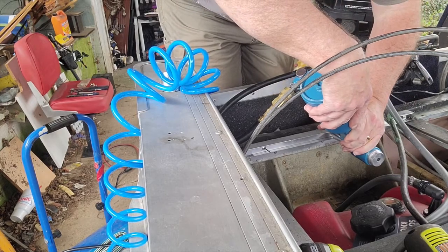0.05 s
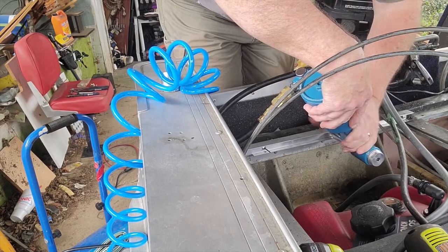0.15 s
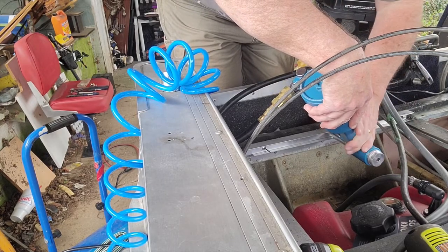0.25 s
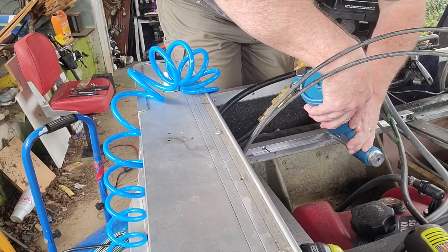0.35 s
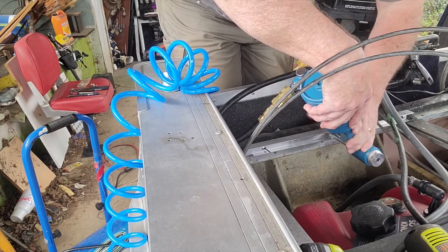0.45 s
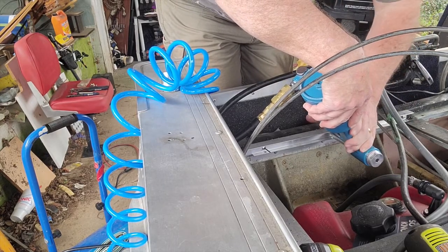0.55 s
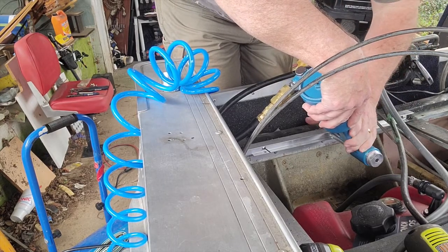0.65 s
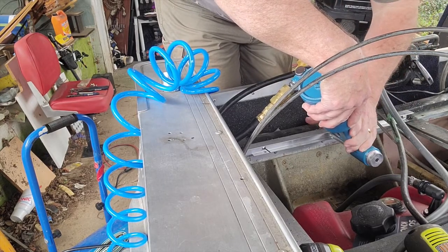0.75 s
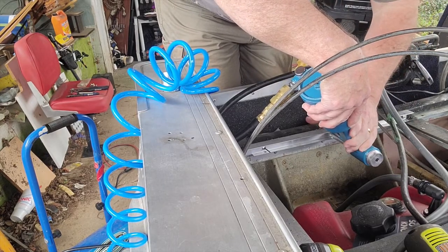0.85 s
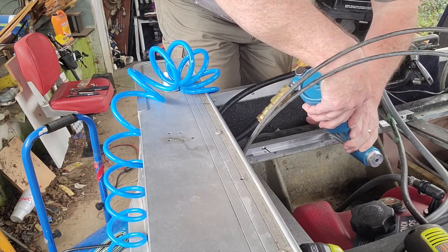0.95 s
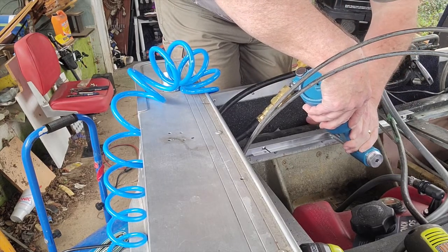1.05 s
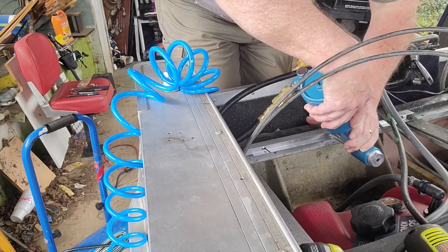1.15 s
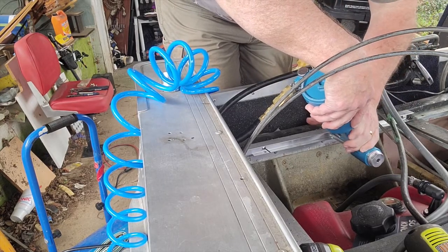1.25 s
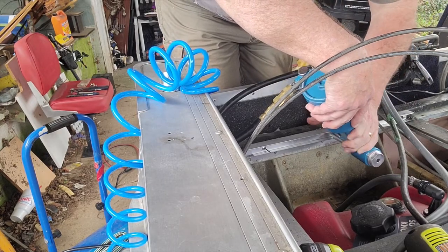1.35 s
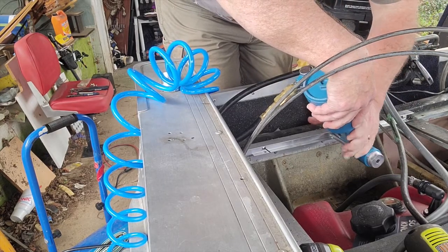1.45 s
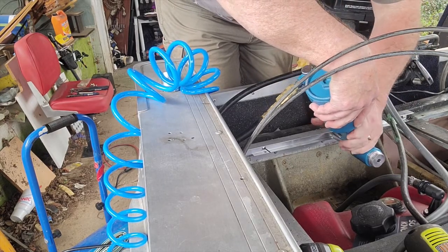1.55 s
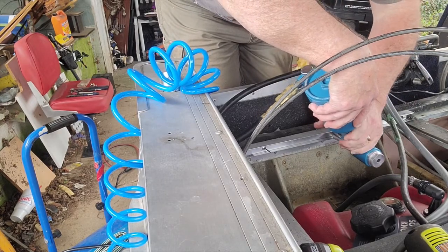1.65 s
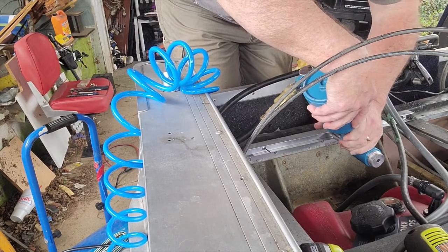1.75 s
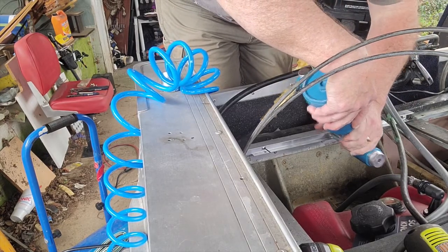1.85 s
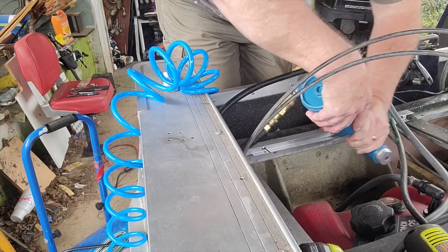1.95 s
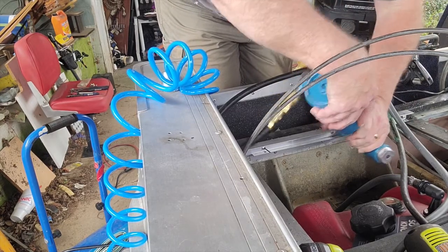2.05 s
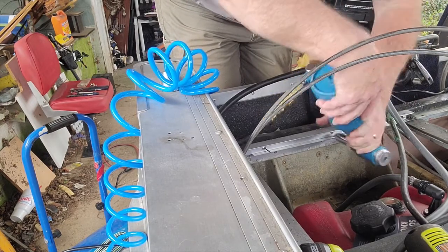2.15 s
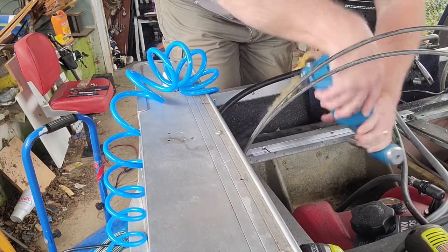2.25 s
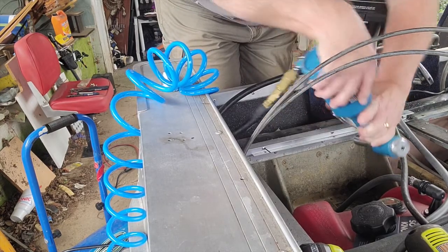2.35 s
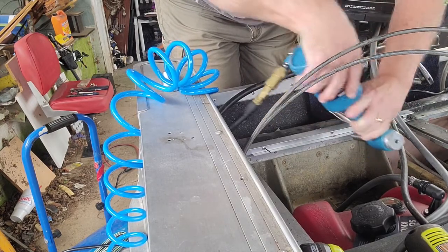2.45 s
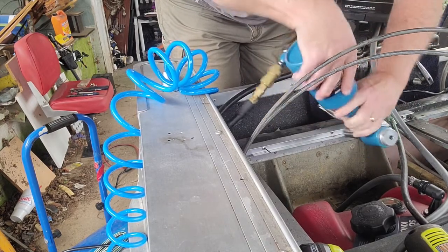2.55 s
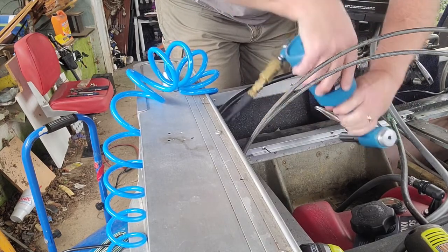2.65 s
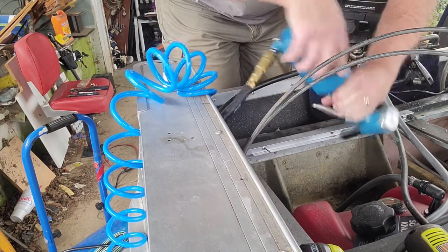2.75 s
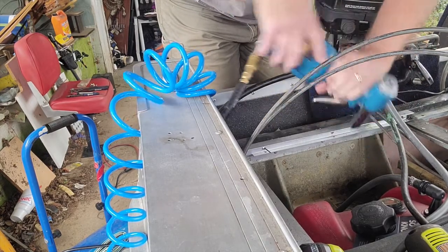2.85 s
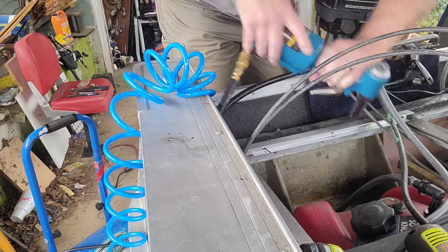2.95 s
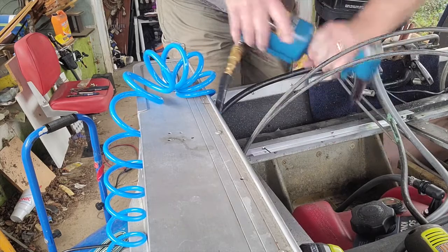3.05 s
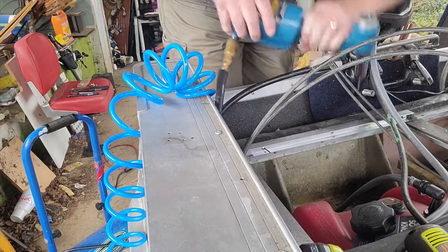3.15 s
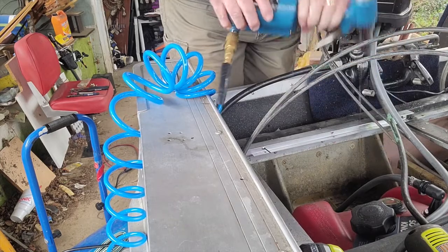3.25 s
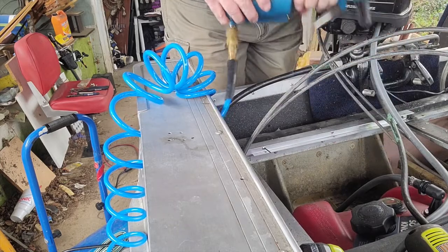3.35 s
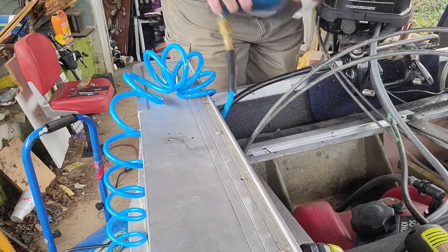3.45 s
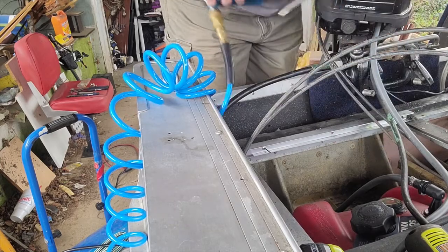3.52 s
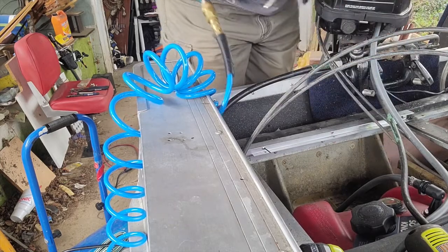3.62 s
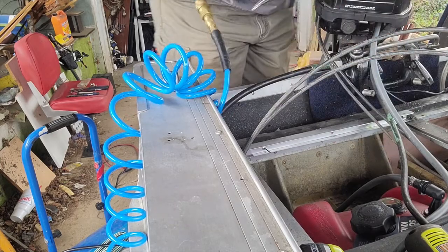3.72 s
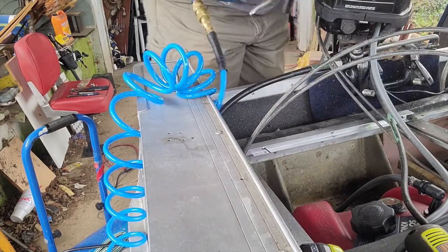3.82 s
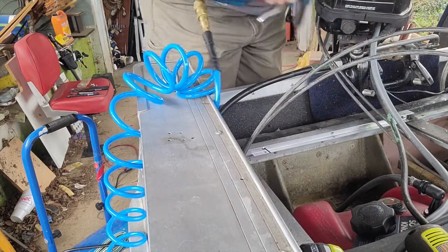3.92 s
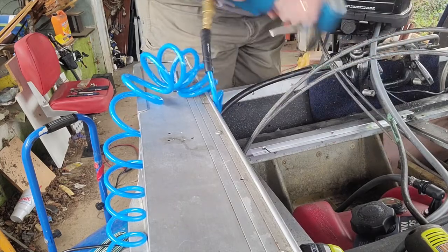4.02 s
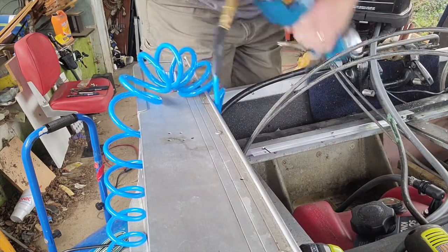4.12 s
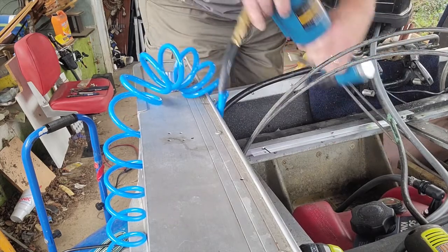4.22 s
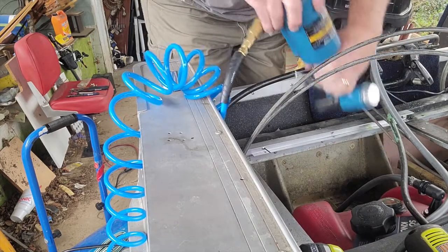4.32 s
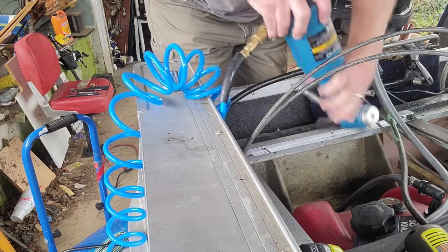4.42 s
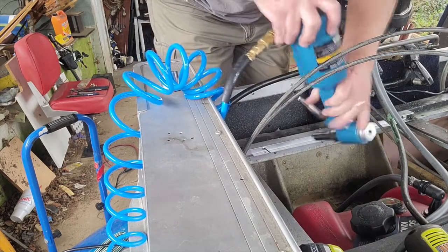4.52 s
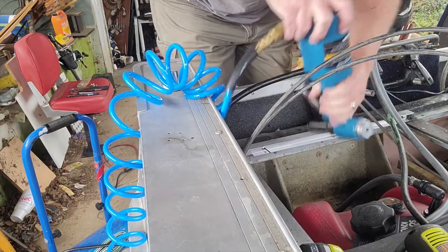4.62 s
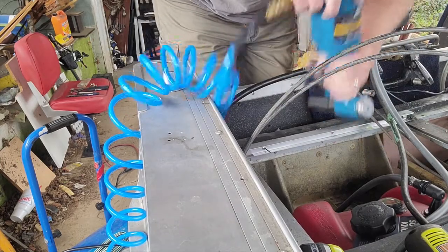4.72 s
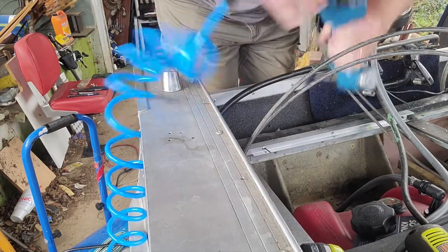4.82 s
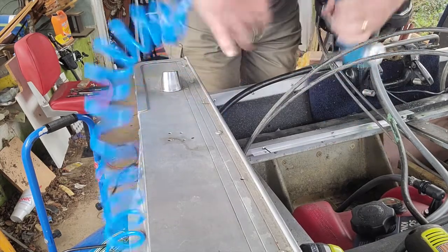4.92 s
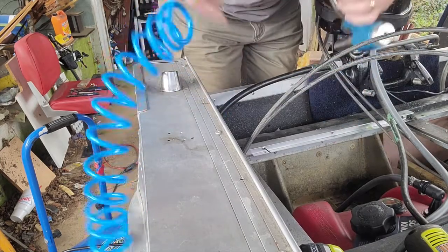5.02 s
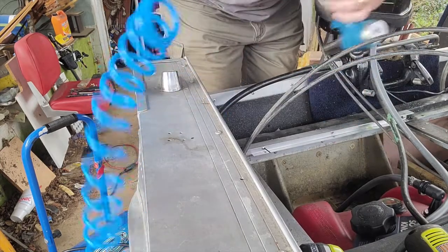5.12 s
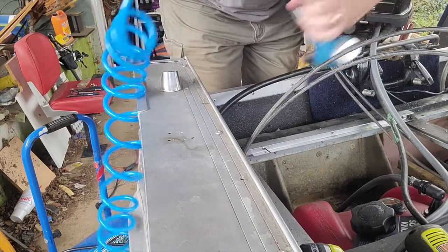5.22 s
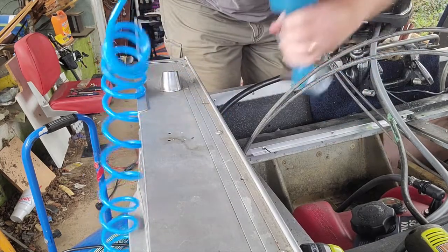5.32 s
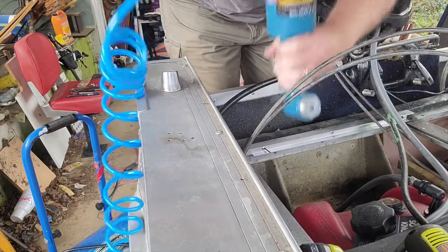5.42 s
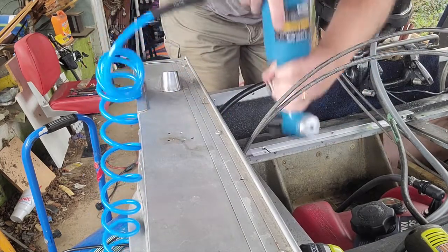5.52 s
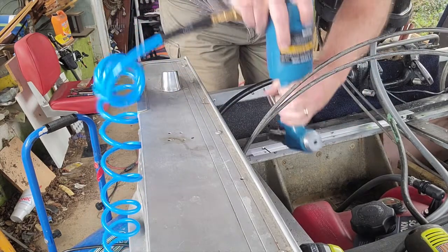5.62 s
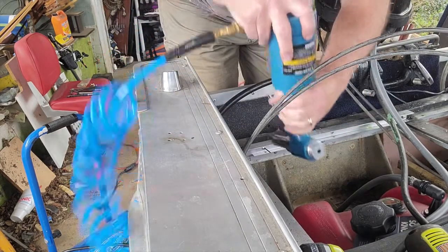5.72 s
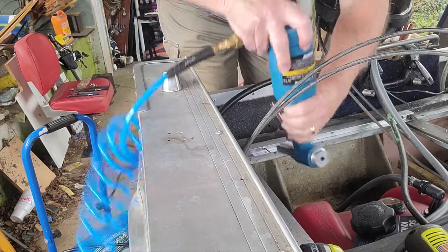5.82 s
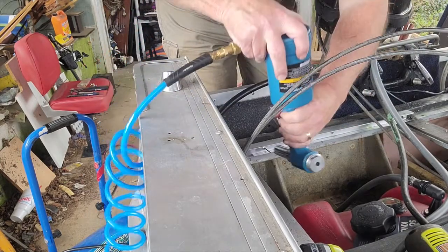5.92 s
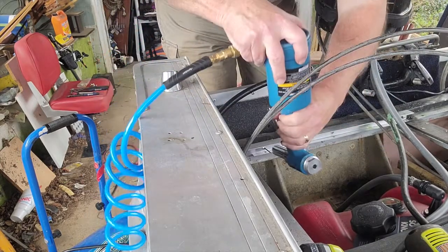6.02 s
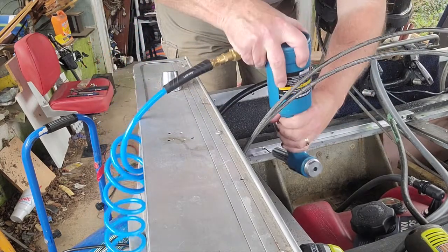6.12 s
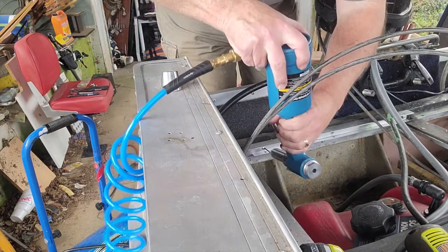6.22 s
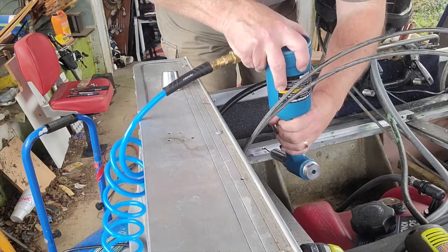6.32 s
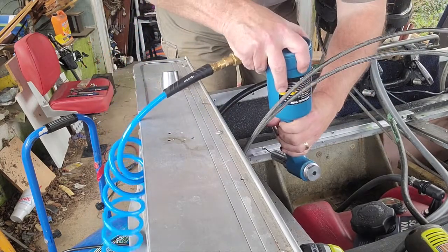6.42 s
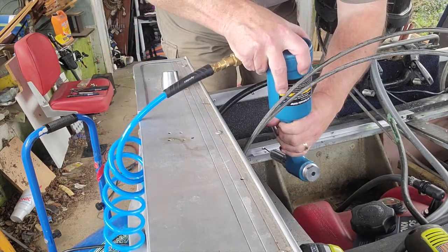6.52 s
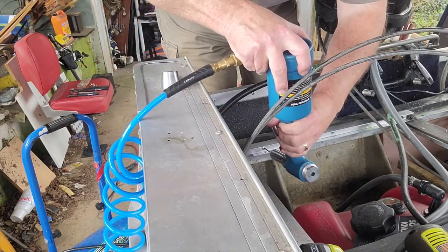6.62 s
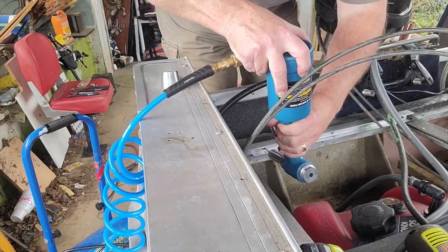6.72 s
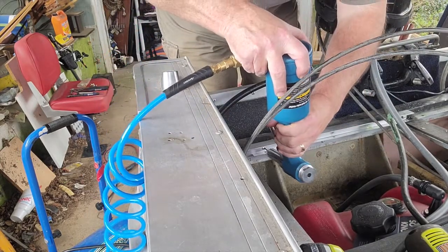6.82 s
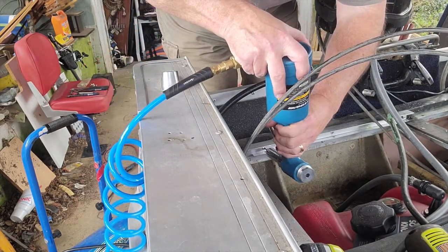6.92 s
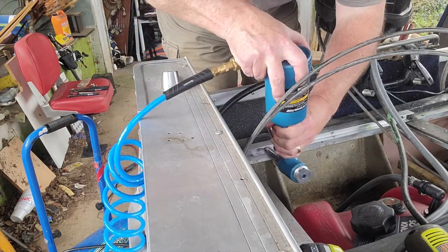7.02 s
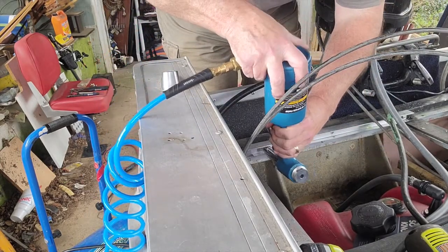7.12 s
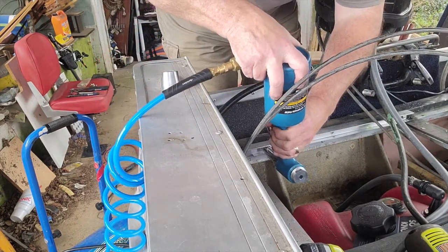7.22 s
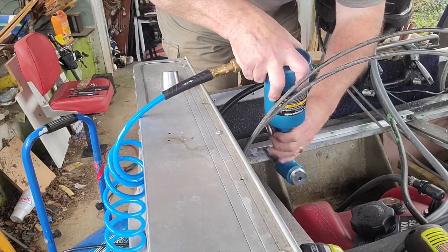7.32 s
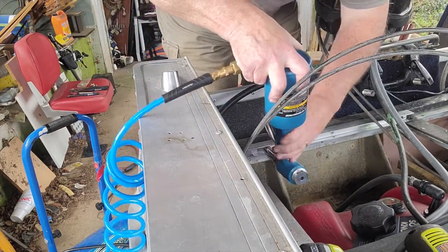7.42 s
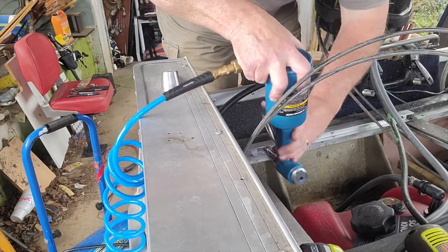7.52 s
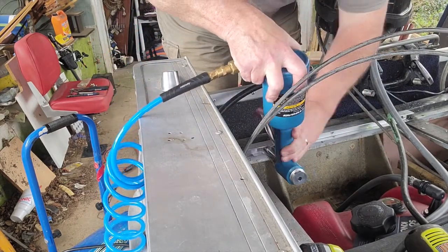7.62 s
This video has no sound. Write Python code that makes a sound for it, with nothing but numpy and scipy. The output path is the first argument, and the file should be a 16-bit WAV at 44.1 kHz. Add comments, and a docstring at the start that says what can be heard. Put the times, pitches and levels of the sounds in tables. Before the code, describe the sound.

Close stereo pickup in an open shed: bright compressed air bursts out, stutters and stops. Small knocks lead to a loud crack on hollow metal, with another hissing exhaust soon after. Later come a bright ringing clink, irregular metal taps, soft hand and hose rubbing, and a last dull double knock with a hull thump, above faint rumble and microphone hiss.

```python
"""Air rivet gun on a boat deck

An air rivet gun works on an aluminium deck in an open shed. Air jets vent in long rushes and short puffs;
the piston judders back in slips and groans. The mandrel snaps and booms in the hull, then gun, hose and
fitting knock, ring and rub. Jets and friction are shaped noise, blows are noise through resonant modes,
booms and rings are dying sines. A shed tail, distant rumble and microphone hiss lie underneath."""
import sys
import numpy as np
from scipy import signal
from scipy.fft import rfft, irfft, next_fast_len
from scipy.io import wavfile
from scipy.ndimage import uniform_filter1d, map_coordinates

SR = 44100
rng = np.random.default_rng(int(sys.argv[2]) if len(sys.argv) > 2 else 0)


def wrap_up_sound(samples):
    """Save the sound to the file named by the first command line argument, as 16-bit audio."""
    columns = np.atleast_2d(samples).T
    # keep every value between -1 and 1, then stretch to whole-number steps
    tamed = np.clip(columns, -1, 1)
    steps = np.round(tamed * 32767).astype(np.int16)
    wavfile.write(sys.argv[1], SR, steps)


N = 338247

# Levels are relative to the stage they feed.
# Air bursts; at 0.651 s the piston's jolt renews the first vent: (burst starts [s], lasts [s], rush rise [s],
# rush level [dB], rush fall time, 20 dB at pace 1 [s], leak level [dB], first fizz level [dB])
AIR_BURSTS = [(0.283, .362, 0.024, -14.5, 0.34, -34, -13.5),
              (.651, .505, .003, -27.5, 0.0362, -33.5, -40.5),
              (1.618, .14, .004, -32.5, 0.08, -69.5, -30.5), (1.94, .16, .004, -24, 0.12, -70.5, -19.5),
              (2.448, 0.83, .006, -19, 0.3, -28, -11.5)]
# Air bands, low rush, cylinder resonance, body, fizz: (rush level [dB], rush decay pace [ratio], leak level [dB])
AIR_BANDS = [(-12.5, 0.6, -4.5), (-10.5, 0.51, -0.7), (0.1, 1.13, 0.16), (2.5, 1.4, 2.5)]
# Jet noise spectrum: (frequency [Hz], level [dB])
JET_SPECTRUM = [(290, -26), (500, -18), (1020, -13), (1360, -4.5), (2610, -3.5), (2980, -10), (3760, -9.5),
                (6160, -10.5), (10800, -15.5), (12700, -13.5), (16000, -13)]
# Exhaust port and cylinder modes: (frequency [Hz], width [Hz], level [dB])
PORT_MODES = [(2360, 18, -1), (2690, 230, -5.5), (3680, 400, -4.5), (4870, 76, -4), (6940, 850, -14),
              (13700, 540, -3)]
AIR_EDGES_HZ = [2200, 2900, 7000]
RUSH_BEND_POWER, LEAK_FALL_DB_PER_S, LEAK_DROOP_DB = 1.57, 19.5, 6
BURST_ONSET_DB_PER_S, BURST_END_DB_PER_S, FIZZ_T60_S = 2199.5, 601.5, 0.12

# Knocks: (time [s], mid level [dB], low level [dB], high level [dB], t60 [s], struck-spot note [Hz])
KNOCKS = [(0.9384, -33.5, -26, -40.5, 0.089, 657), (1.1524, -41, -28.5, -53, 0.067, 1023),
          (1.3004, -40.5, -33.5, -59, 0.12, 455), (1.603, -50, -31.5, -60.5, 0.16, 297),
          (1.6252, -23, -20.5, -27, 0.083, 310), (1.6383, -27.5, -20.5, -24, 0.16, 266),
          (1.9394, -36, -7.5, -11.5, 0.09, 364), (1.953, -4.5, -4, -8, 0.061, 568),
          (1.9624, -6.5, -4, -20, 0.12, 409.5), (2.8185, -32, -30.5, -35, 0.092, 385),
          (3.3266, -56, -41.5, -65, 0.067, 946), (3.5124, -45.5, -38, -58, 0.092, 594),
          (3.5651, -9, -33, -8, 0.12, 1677), (3.5888, -8.5, -25.5, -24, 0.099, 1685),
          (3.6737, -27.5, -46, -40, 0.13, 1760), (3.7025, -27.5, -34.5, -44.5, 0.13, 1630),
          (3.7763, -29.5, -37, -26, 0.11, 1680), (3.9686, -63, -37, -58, 0.089, 920),
          (4.1519, -46.5, -50.5, -62, 0.083, 672), (4.8048, -29.5, -32, -43, 0.14, 1674),
          (4.9332, -34, -33.5, -65, 0.12, 1410), (5.0795, -20, -24, -34, 0.13, 870),
          (5.1177, -13.5, -19.5, -20, 0.082, 954), (5.237, -26, -33, -34, 0.12, 937),
          (5.3034, -20, -23, -31.5, 0.11, 1270), (5.5424, -49, -47.5, -56.5, 0.09, 419),
          (5.5964, -50, -45.5, -64, 0.081, 660), (5.7659, -28.5, -29, -42, 0.24, 933),
          (5.8147, -15, -26.5, -30, 0.055, 1190), (5.9513, -19, -20.5, -34, 0.21, 1160),
          (6.0198, -22, -29.5, -35, 0.12, 1480), (6.1786, -48, -43.5, -50.5, 0.081, 3100),
          (6.2337, -60, -39.5, -69, 0.14, 374), (6.79, -60, -50, -70, 0.36, 1040),
          (6.84, -59.5, -50, -70, 0.23, 946), (7.1608, -24.5, -26, -42.5, 0.088, 1010),
          (7.1673, -28, -21, -29.5, 0.095, 475), (7.1877, -32.5, -25.5, -51, 0.11, 493),
          (7.3442, -32.5, -40.5, -58, 0.12, 467), (7.4368, -58, -45, -61, 0.09, 944)]
# Hard metal ticks: (time [s], level [dB], centre [Hz])
TICKS = [(0.652, -13, 3936), (0.6763, -22, 2455), (1.953, -0.5, 3680), (3.5651, -7.5, 1836),
         (3.7744, -19.5, 4700), (4.8065, -26.5, 1910), (5.1183, -17.5, 5050), (5.3039, -9.5, 2820),
         (5.8154, -32.5, 3260), (5.9504, -15, 2360), (6.0202, -12.5, 2566)]
# Modes of deck sheet, gun body and steel nose: (frequency [Hz], width [Hz], level [dB])
METAL_MODES = [(332, 40, -3), (400, 23, 2.5), (568, 24, -11.5), (920, 20, 0), (1328, 240, -4.5),
               (1658, 23, 6.5), (1890, 89, -14), (2455, 110, -7), (3163, 460, -6), (3410, 31, -7.5),
               (4900, 200, -17), (5600, 200, -13), (5760, 250, -13.5), (6960, 250, -9.5)]
# How strongly a struck spot sounds its note: (frequency [Hz], level [dB])
SPOT_LEVELS = [(300, 11), (390, 8), (460, 7.5), (570, -4), (680, 10.5), (930, 13), (1040, 12), (1180, 4.5),
               (1290, 10), (1550, 1.5), (1750, 10), (3100, 13.5)]
# Broad rattle bands, low to top: (centre [Hz], width [Hz], level before cubing [dB])
RATTLE_BANDS = [(520, 1124, 3.78), (2170, 3330, 1.64), (5200, 6100, 2.5), (11800, 6400, 2.8)]
TOP_BAND_REL_HIGH_DB = -8.5
# Piston slips back: even gaps, mid and high levels fall slip by slip
JUDDER_START_S, SLIP_GAP_S, SLIP_COUNT, SLIP_T60_S, SLIP_NOTE_HZ = .6504, .027, 5, .09, 663
SLIP_MID_DB, SLIP_LOW_DB, SLIP_HIGH_REL_MID_DB, SLIP_LOSS_DB = -20.5, -28, -5.0, 3

# Hull booms: (time [s], level [dB], pitch [Hz], held before decay [s])
BOOMS = [(0.294, -26, 183, 0.00084), (1.153, -41, 87, .005), (1.301, -44, 136, 0.016),
         (1.606, -30.5, 76, .01), (1.624, -20, 79, 0.037), (1.638, -25.5, 269.5, 0.016),
         (1.71, -32, 88.3, .04), (1.944, -16, 198, 0.0013), (1.949, -28.5, 286, 0.025),
         (1.975, -19.5, 167.5, 0.0089), (2.0, -32, 110, .04), (2.447, -31, 127, 0.00087),
         (3.566, -28.5, 226, .001), (5.08, -48.5, 71.5, .04), (5.768, -35, 238, 0.00092),
         (5.95, -36.5, 253, 0.011), (6.016, -39, 130.5, 0.037), (7.17, -24, 228, 0.0045),
         (7.18, -22.5, 126, 0.0064), (7.213, -23.5, 106, 0.014)]
BOOM_RISE_S, BOOM_T60_S, HULL_MODE_HZ, HULL_MODE_GAIN = 0.0017, 0.081, 76, 0.4

# Piston and hose groans: (time [s], length [s], level [dB], centre pitch from [Hz], centre pitch to [Hz])
GROANS = [(0.932, 0.13, -39.5, 702, 662), (1.055, 0.08, -44, 547, 514), (1.832, 0.14, -49, 720, 733)]
# Thin gun parts ringing: (time [s], frequency [Hz], level [dB], t60 [s])
THIN_RINGS = [(1.66, 5140, -43, 0.25), (1.9, 4640, -65, 0.27), (2.031, 2258, -63, 0.92),
              (3.599, 2455, -36.5, 0.57), (3.58, 1700, -32, .3)]
GROAN_EDGE_S, GROAN_FADE_DB, THIRD_PARTIAL_DB = 0.0081, 8.5, -16

# Rubbing of hands and hose: (loudest [s], level [dB], time to fall 13.2 dB [s])
RUBS = [(5.57, -66.5, 1.85), (6.08, -60.5, .2), (6.535, -58, .07), (6.905, -56, .11), (7.506, -63.5, 0.4)]
# Friction spectrum: (frequency [Hz], level [dB])
CLOTH_SPECTRUM = [(710, -31), (1200, -3.5), (2550, -3), (4810, -11.5), (8000, -19), (10400, -41),
                  (17600, -120)]
RUB_FALL_DB, RUB_RISE_PER_FADE = 13.2, .8

# Gun position as arrival lead: (time [s], left lead [samples])
LEFT_LEAD = [(0, 8), (3.9, 8), (4.4, -2), (6.8, -2), (7.1, 5), (7.7, 5)]
# Gun position as level: (time [s], left minus right [dB])
PAN = [(0, 2), (1.4, 0.5), (2.2, 1), (3.9, 3), (4.4, -1), (6.8, 2), (7.7, 4)]
# Shed decay: (frequency [Hz], t60 [s])
SHED_T60 = [(100, 0.51), (1000, 0.26), (5000, 0.18), (15000, 0.2)]
SHED_NEAR_DB, SHED_JET_DB, SHED_DELAY_SAMPLES = -9, -3, 400
# Background spectrum: (frequency [Hz], level [dB])
FLOOR_SPECTRUM = [(15, -38.5), (25, -15.5), (64, 0.5), (153, -12), (345, -18.5), (440, -24.5), (531, -23.5),
                  (576, -31.5), (755, -26), (1570, -38.5), (11000, -36.5), (13300, -29), (16000, -34.5)]
# Background left-right likeness: (frequency [Hz], correlation [-1 to 1])
FLOOR_ALIKE = [(60, 0.9), (180, 0.86), (550, 0.68), (1650, 0.18), (4970, -0.37), (15000, 0.19)]
HISS_GAIN_DB, RUMBLE_DB, RUMBLE_SWAY_DB = -47.5, -55, 1.5
# Microphone imbalance: (frequency [Hz], left minus right [dB])
MIC_LEAN = [(60, 1), (700, 2), (4000, 3), (15000, 6)]
BAND_LIMIT_HZ = 16190


def amp(db):
    """dB to amplitude."""
    return 10 ** (np.asarray(db) / 20)


def unit(x):
    """Scale to unit RMS."""
    return x / np.sqrt(np.mean(np.abs(x) ** 2) + 1e-20)


def since(s):
    """Seconds since s, 0 before it."""
    return np.maximum(np.arange(N) / SR - s, 0)


def along(points, hz):
    """Interpolate (Hz, value) points on a log axis."""
    f, v = np.transpose(points)
    return np.interp(np.log(hz + 1), np.log(f + 1), v)


def curves(rows):
    """One value per sample for each column after the time."""
    s, *cols = np.transpose(rows)
    return [np.interp(np.arange(N) / SR, s, c) for c in cols]


def wobble(rate_hz):
    """Smooth random curve, rate_hz knots a second."""
    knots = rng.standard_normal(int(N * rate_hz / SR) + 4)
    return map_coordinates(knots, [np.arange(N) * rate_hz / SR])


def filtered(x, response):
    """Multiply the spectrum of x by response(Hz)."""
    m = next_fast_len(N + SR // 2)
    return irfft(rfft(x, m) * response(np.fft.rfftfreq(m, 1 / SR)), m)[..., :N]


def resonances(modes, f):
    """Causal sum of (Hz, width Hz, dB) modes, signs alternating."""
    total = 0
    for k, (centre, width, db) in enumerate(modes):
        damping = 1j * f * width
        total = total + (-1) ** k * amp(db) * damping / (centre * centre - f * f + damping)
    return total


def pair(shape, alike):
    """Two noises with correlation alike."""
    a, b = rng.standard_normal((2, *shape))
    turn = np.arccos(np.clip(alike, -1, 1)) / 2
    return np.array([np.cos(turn) * a + np.sin(turn) * b, np.cos(turn) * a - np.sin(turn) * b])


def patchy(x, patchy_db, long_frames=8):
    """Random gain patches over time and frequency."""
    z = signal.stft(x, nperseg=1024)[2]
    field = uniform_filter1d(rng.standard_normal(z.shape[1:]), 2, 0)
    field = uniform_filter1d(field, long_frames, 1)
    return signal.istft(z * amp(patchy_db * unit(field)), nperseg=1024)[1][:, :N]


def air():
    """Turbulent jet coloured by the port: a rush collapsing as the cylinder empties, over a slowly dying leak."""
    def colour(f):
        return amp(along(JET_SPECTRUM, f)) * (0.47 + 1.1 * np.abs(resonances(PORT_MODES, f)))

    def band_masks(f):
        return np.digitize(f, AIR_EDGES_HZ) == np.arange(4)[:, None, None]

    noise = patchy(pair((N,), alike=0.47), patchy_db=4.0, long_frames=11)
    bands = filtered(noise, lambda f: colour(f) * band_masks(f))
    in_rush_db, pace, in_leak_db = np.transpose(AIR_BANDS)[:, :, None]
    power = np.zeros((4, N))
    for s, lasts_s, rise_s, rush_db, rush_s, leak_db, fizz_db in AIR_BURSTS:
        t = since(s)
        rush = amp(rush_db + in_rush_db - 20 * pace * (t / rush_s) ** RUSH_BEND_POWER)
        rush = rush * (1 - .6 * np.exp(-t / rise_s))
        leak_fall_db = LEAK_FALL_DB_PER_S * t + LEAK_DROOP_DB * (t / lasts_s) ** 4
        leak = amp(leak_db + in_leak_db - leak_fall_db)
        flow = rush ** 2 + leak ** 2
        flow[-1] += amp(fizz_db - 60 * t / FIZZ_T60_S) ** 2  # first fizz, top band only
        before_s = np.maximum(s - np.arange(N) / SR, 0)
        gate = amp(-BURST_END_DB_PER_S * since(s + lasts_s) - BURST_ONSET_DB_PER_S * before_s)
        power += flow * gate ** 2
    eddies = amp(1.0 * wobble(300) + 0.92 * wobble(40))
    return eddies * sum(np.sqrt(p) * unit(band) for p, band in zip(power, bands))


def judder():
    """Evenly spaced piston slips, as KNOCKS rows; mid and high levels weaken slip by slip."""
    slips = []
    for k in range(SLIP_COUNT):
        mid_db = SLIP_MID_DB - k * SLIP_LOSS_DB
        high_db = mid_db + SLIP_HIGH_REL_MID_DB
        slips.append((JUDDER_START_S + k * SLIP_GAP_S, mid_db, SLIP_LOW_DB, high_db, SLIP_T60_S, SLIP_NOTE_HZ))
    return slips


def knocks():
    """Blows as dying broadband rattle exciting metal modes and the struck spot's note; hard contacts add ticks."""
    size = 2 ** 13
    t, f = np.arange(size) / SR, np.fft.rfftfreq(size, 1 / SR)
    modes = np.array([(-1) ** k * resonances([mode], f) for k, mode in enumerate(METAL_MODES)])
    broad = [resonances([band], f) ** 3 for band in RATTLE_BANDS]
    rise = (1 - np.exp(-t / 0.001)) ** 2
    fade = np.cos(np.pi / 2 * t / t[-1])
    out = np.zeros((2, N + size))
    for s, mid_db, low_db, high_db, t60_s, note_hz in judder() + list(KNOCKS):
        levels = amp([low_db, mid_db, high_db, high_db + TOP_BAND_REL_HIGH_DB])
        dull_burst = rise * amp(-60 * t / t60_s) * pair(t.shape, alike=0.66)
        bright_burst = rise * amp(-60 * t / (0.9 * t60_s)) * pair(t.shape, alike=0.27)  # treble dies sooner
        dull = rfft(dull_burst) * (levels[:2] @ broad[:2])
        bright = rfft(bright_burst) * (levels[2:] @ broad[2:])
        ringing = .6 + amp(rng.normal(0, 2.5, len(modes))) @ modes  # mode levels vary per blow
        note = resonances([(note_hz, 0.05 * note_hz, along(SPOT_LEVELS, note_hz))], f)
        out[:, round(s * SR):][:, :size] += fade * irfft((dull + bright) * (ringing + note))
    for s, db, centre_hz in TICKS:
        crack = amp(db - 60 * t / .006) * pair(t.shape, alike=.8)
        body = resonances([(centre_hz, 1.3 * centre_hz, 3)], f) ** 2
        out[:, round(s * SR):][:, :size] += fade * irfft(rfft(crack) * body)
    return out[:, :N]


def booms():
    """A hull panel swells and dies as an unsteady sine and stirs a low hull mode."""
    t, out = np.arange(SR // 2) / SR, np.zeros(N + SR)
    for s, db, hz, held_s in BOOMS:
        swell = (1 - np.exp(-t / BOOM_RISE_S)) * amp(db - 60 * np.maximum(t - held_s, 0) / BOOM_T60_S)
        panel = np.sin(2 * np.pi * hz * t)
        hull = HULL_MODE_GAIN * np.sin(2 * np.pi * HULL_MODE_HZ * t)
        out[round(s * SR):][:len(t)] += swell * (panel + hull)
    return out[:N] * amp(2 * wobble(90))


def piston():
    """Sliding groans of rough, breaking pitch with a weak third partial, plus dying sines of thin gun parts."""
    out, flutter, breaks = np.zeros(N), 1 + .055 * wobble(300), amp(3.5 * wobble(70))
    for s, length_s, db, from_hz, to_hz in GROANS:
        gone = since(s) / length_s
        pitch_hz = (from_hz + (to_hz - from_hz) * gone) * flutter
        phase = 2 * np.pi * np.cumsum(pitch_hz) / SR
        edges = np.clip(np.minimum(gone, 1 - gone) * length_s / GROAN_EDGE_S, 0, 1)
        tone = np.sin(phase) + amp(THIRD_PARTIAL_DB) * np.sin(3 * phase)
        out += edges * breaks * amp(db - GROAN_FADE_DB * gone) * tone
    t, waver_rad = np.arange(SR // 2) / SR, .6 * wobble(80)
    for s, hz, db, t60_s in THIN_RINGS:
        at = slice(round(s * SR), round(s * SR) + len(t))
        out[at] += amp(db - 60 * t / t60_s) * np.sin(2 * np.pi * hz * t + waver_rad[at])
    return out


def rubbing():
    """Grainy friction noise of hands and hose, swelling and fading in strokes."""
    grains = pair((N,), alike=0.25) * amp(1.3 * wobble(220))
    t, strokes = np.arange(N) / SR, 0
    for s, db, fade_s in RUBS:
        away = np.maximum((t - s) / fade_s, (s - t) / (RUB_RISE_PER_FADE * fade_s))
        strokes = strokes + amp(db - RUB_FALL_DB * away)
    return strokes * unit(filtered(grains, lambda f: amp(along(CLOTH_SPECTRUM, f))))


def ports(x):
    """Direct path to two microphone ports: arrival lead and level follow the moving gun."""
    lead, pan_db = curves(LEFT_LEAD)[0], curves(PAN)[0]
    right = map_coordinates(x[1], [np.arange(N) - lead])
    return np.array([x[0], right]) * amp([pan_db / 2, -pan_db / 2])


def shed(x):
    """Delayed diffuse tail; each frequency dies at its own rate."""
    hz, t, z = signal.stft(rng.standard_normal((2, SR // 2)), SR, nperseg=256)
    decay = amp(-60 * t / along(SHED_T60, hz)[:, None])
    tail = signal.istft(z * decay, SR, nperseg=256)[1]
    delayed = np.pad(x.mean(0), (SHED_DELAY_SAMPLES, 0))[None]
    return signal.fftconvolve(delayed, tail / np.linalg.norm(tail[0]), axes=1)[:, :N]


def floor():
    """Far rumble, alike in both ports and slowly swaying, under microphone hiss; likeness varies with frequency."""
    def mid_side(hz):
        turn = np.arccos(np.clip(along(FLOOR_ALIKE, hz), -1, 1)) / 2
        return amp(along(FLOOR_SPECTRUM, hz)) * [np.cos(turn), np.sin(turn)]

    noise = patchy(rng.standard_normal((2, N)), patchy_db=3.0)
    mid, side = filtered(noise, mid_side)
    both = unit(np.array([mid + side, mid - side]))
    low = filtered(both, lambda f: 1 / (1 + (f / 400) ** 2))
    rumble = amp(RUMBLE_DB + RUMBLE_SWAY_DB * wobble(1.8)) * unit(low)
    return amp(HISS_GAIN_DB) * (both - low) + rumble


def scene():
    """Sum the direct sources, the shed tail and the background."""
    near = knocks() + booms() + piston() + rubbing()
    jet = air()
    return ports(near + jet) + shed(amp(SHED_NEAR_DB) * near + amp(SHED_JET_DB) * jet) + floor()


def record(dry):
    """Unequal microphone ports, soft ceiling at full scale, then a sharp band limit."""
    lean = filtered(dry, lambda hz: amp(np.outer([.5, -.5], along(MIC_LEAN, hz))))
    held = lean / (1 + np.abs(lean) ** 6) ** (1 / 6)
    return filtered(held, lambda hz: hz < BAND_LIMIT_HZ)


dry = scene()
out = record(dry)
wrap_up_sound(out)
```